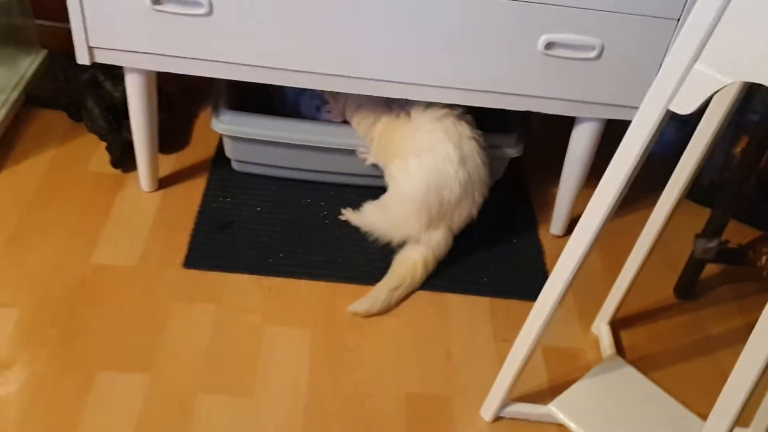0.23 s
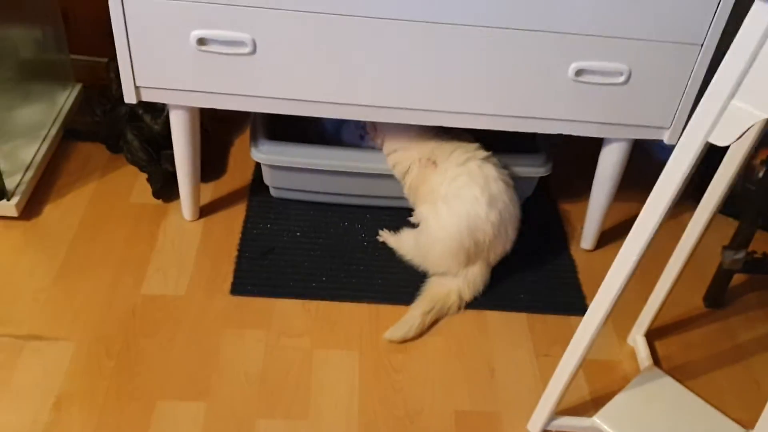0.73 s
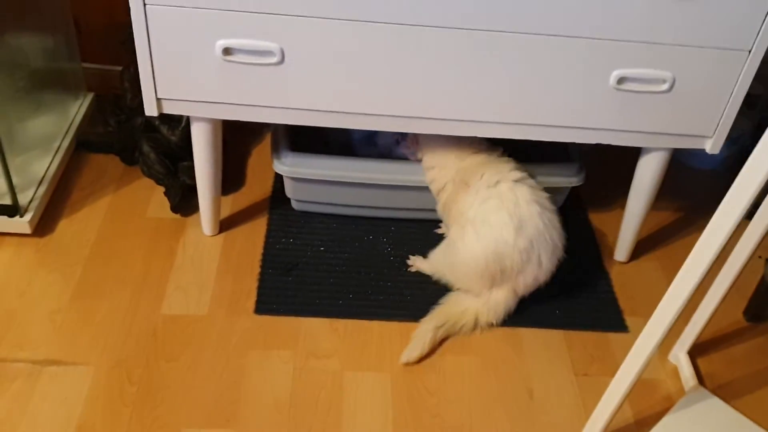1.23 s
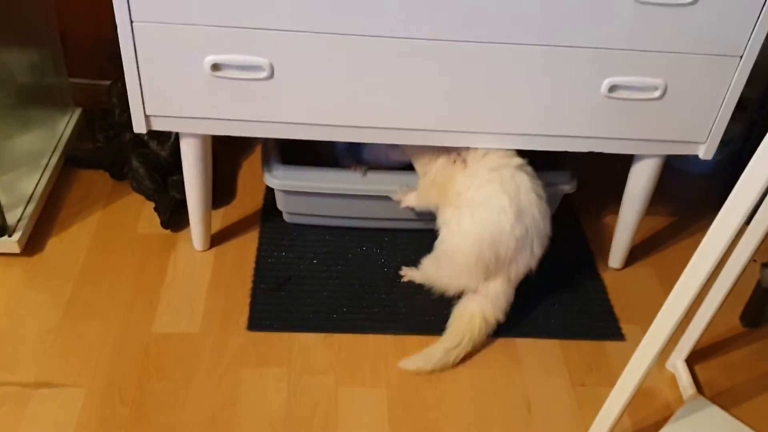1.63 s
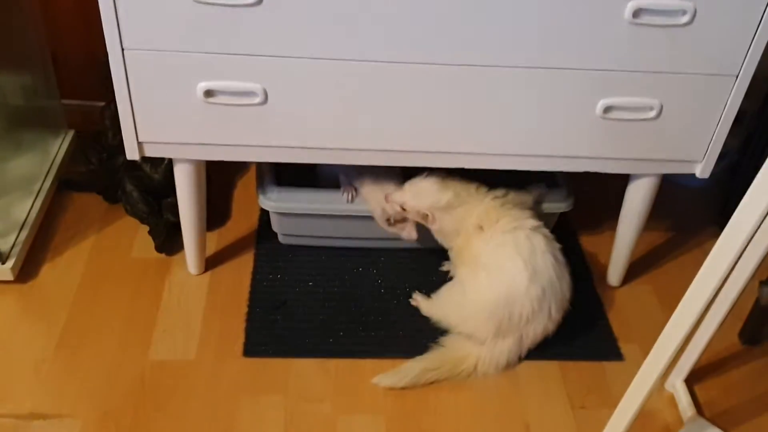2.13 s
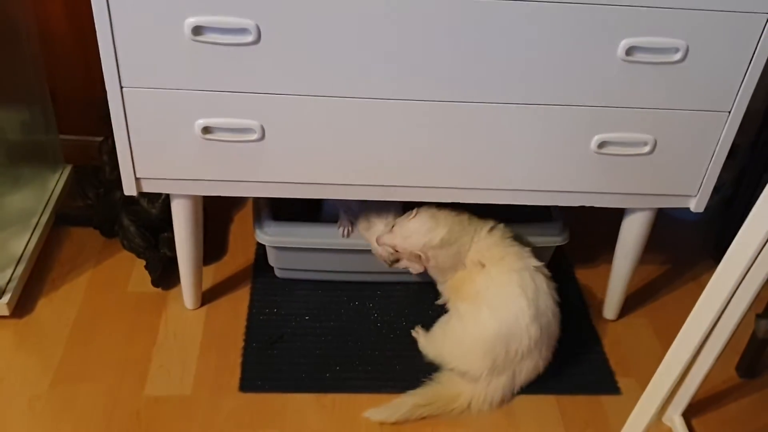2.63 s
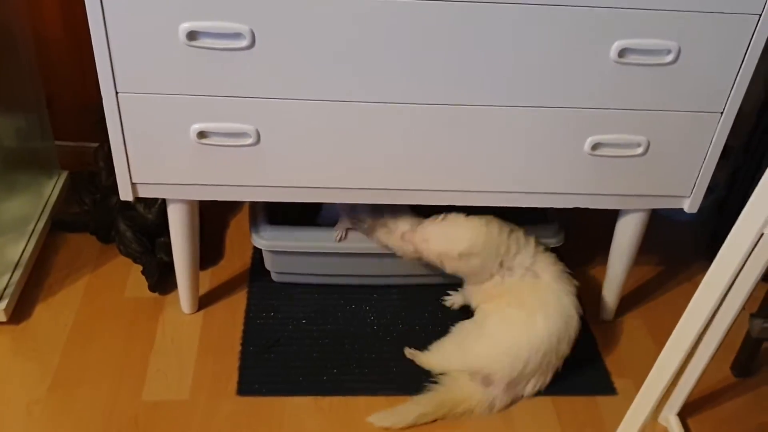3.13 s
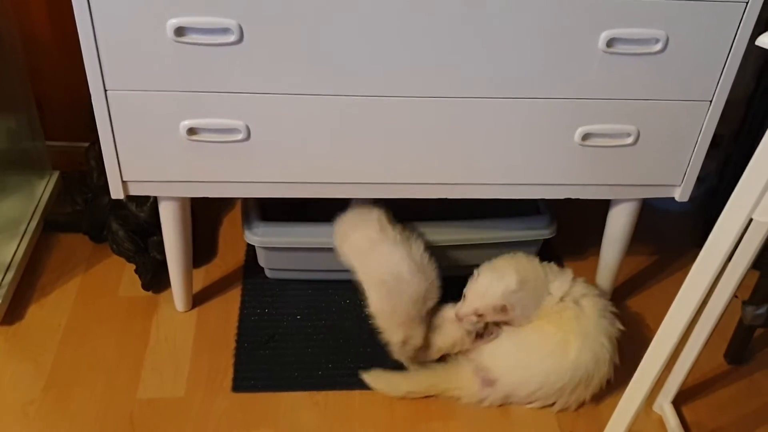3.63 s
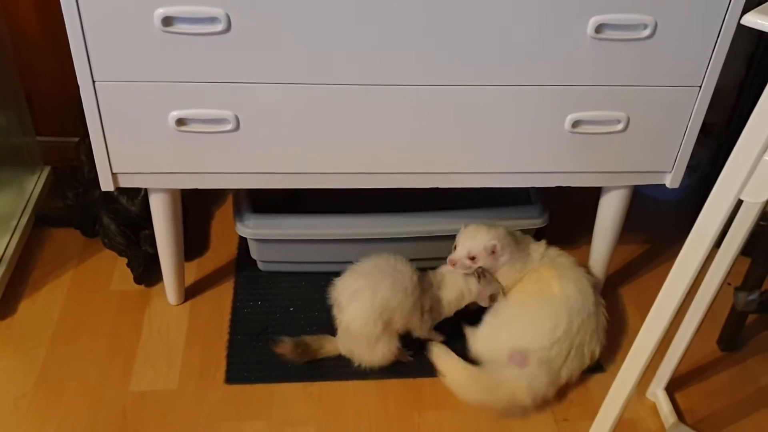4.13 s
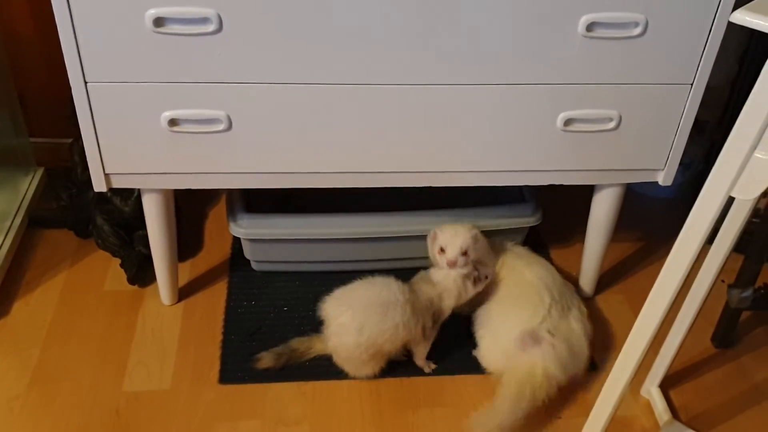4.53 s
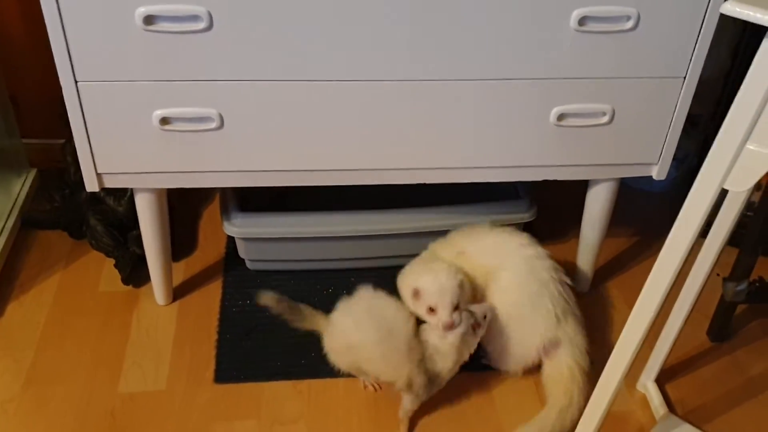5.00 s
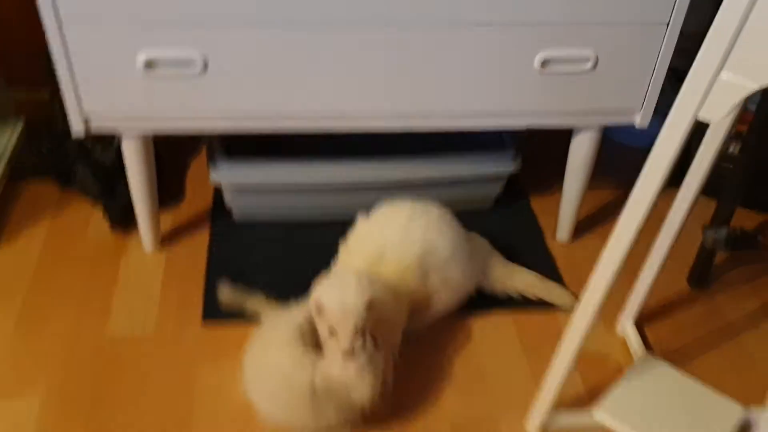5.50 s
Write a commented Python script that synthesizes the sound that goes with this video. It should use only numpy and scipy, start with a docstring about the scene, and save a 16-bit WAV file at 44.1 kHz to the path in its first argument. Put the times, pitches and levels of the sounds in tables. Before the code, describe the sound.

In a quiet small room, a nearby microphone picks up two ferrets playing. Their bodies knock against a plastic tub and thump softly on the floor, with scratching claws and rustling fur. Soft grunts and clucks come in short runs, then turn into louder, rapid chatter with a couple of sharp squeaks and small hisses. A last bump and cluck come at the end.

```python
"""Ferrets wrestling around a tub

Two ferrets wrestle in and beside a plastic tub in a small quiet room. Their clucks, about eleven a second
in a run, and squeaks are harmonic series with noise; grunts, hisses and sniffs are shaped noise.
Bumps are damped pulses that excite the modes of the tub, landings are deep thuds, claws click and scrape
as grainy bursts, and fur brushes as patchy noise. Echoes and a decaying tail form the room over a hush."""
import sys
import numpy as np
from scipy import signal
from scipy.fft import rfft, irfft, next_fast_len
from scipy.io import wavfile
from scipy.ndimage import uniform_filter1d

SR = 44100
rng = np.random.default_rng(int(sys.argv[2]) if len(sys.argv) > 2 else 0)


def to_wav(sig):
    """Store sig (one row per channel, or 1-D mono) as 16-bit WAV at the path in sys.argv[1].

    Samples outside -1..1 are clipped; the rate is SR.
    """
    pcm = np.clip(np.atleast_2d(sig), -1, 1) * 32767
    pcm = np.round(pcm).astype(np.int16)
    wavfile.write(sys.argv[1], SR, pcm.T)  # frames by channels


N = 254016  # samples

# Levels in the tables are relative: the layers are balanced again in scene().
# claw clicks: (t/s, level/dB, brightness 0-1)
CLAW_CLICKS = [(.116, -51, .48), (.566, -47, .4), (.57, -36.5, .14), (.625, -51, .94), (1.304, -59.5, 1),
               (1.408, -56, 0), (1.43, -60.5, .8), (1.516, -36.5, .6), (1.977, -43, .4), (2.001, -43, .3),
               (2.012, -44, .6), (2.103, -47.5, .54), (2.134, -37.5, .53), (2.251, -47, .75),
               (2.279, -42.5, .18), (2.281, -40.5, .85), (2.449, -53, .4), (2.481, -51, .2),
               (2.559, -48, .45), (2.785, -55, .35), (2.953, -56, .4), (3.384, -42.5, .31),
               (3.491, -50, .6), (3.609, -51.5, .4), (3.747, -49, .7), (5.228, -35, .73), (5.356, -51, .5)]
# spectra of a dull and a bright contact: (f/Hz, level/dB)
DULL_CONTACT = [(200, -6), (900, 5.5), (1900, -3.5), (2400, 1), (3200, 1), (4200, -7.5), (7500, -11),
                (11000, -15), (16000, -22.5)]
BRIGHT_CONTACT = [(200, -24), (1500, -19.5), (3000, -21), (4500, -8), (6000, -7.5), (7800, 0.5),
                  (9000, 1.5), (11000, 3), (13000, -4), (16000, -8.5)]
# spectrum of air through an open mouth: (f/Hz, level/dB)
OPEN_MOUTH = [(900, -20), (1500, -2), (2100, -26), (3000, 4.5), (4100, -19), (5300, -23), (7100, -2),
              (8600, -17.5), (11300, -18), (16000, -44)]


def amp(db):
    """Level to amplitude ratio: 20 dB is a factor of ten."""
    return 10 ** (np.asarray(db) / 20)


def evened(x):
    """Normalization to a root mean square of 1."""
    return x / np.sqrt(np.mean(x ** 2) + 1e-20)


def read(points, hz):
    """Linear interpolation of a table on a log-frequency axis."""
    f, value = np.transpose(points)
    return np.interp(np.log(hz + 1), np.log(f + 1), value)


def add(mix, s, sound):
    """Superposition of a sound on the mix from time s."""
    part = mix[max(round(s * SR), 0):][:len(sound)]
    part += sound[:len(part)]


def noise(size, colour, other=None, share=0):
    """Random-phase noise of rms 1, its spectrum a blend in dB of one or two colours."""
    hz = np.fft.rfftfreq(size, 1 / SR)
    other = colour if other is None else other
    db = (1 - share) * read(colour, hz) + share * read(other, hz)
    phase = np.exp(2j * np.pi * rng.random(len(hz)))
    return evened(irfft(amp(db) * phase, size))


def band(size, hz, width_hz):
    """Narrow-band noise of rms 1: complex low-passed noise shifted up to a centre frequency."""
    white = rng.standard_normal(size) + 1j * rng.standard_normal(size)
    fuzz = signal.sosfilt(signal.butter(2, width_hz / 2, fs=SR, output="sos"), white)
    carrier = np.exp(2j * np.pi * hz * np.arange(size) / SR)
    return evened((fuzz * carrier).real)


def wander(size, hz):
    """Random modulation: straight lines between normal deviates drawn hz times a second."""
    at = np.arange(size) * hz / SR
    knots = np.arange(int(at[-1]) + 2)
    return np.interp(at, knots, rng.standard_normal(len(knots)))


def gate(t, length, rise, fall):
    """Amplitude envelope with quarter-sine rise and fall, in seconds."""
    opening = np.sin(np.pi / 2 * np.clip(t / rise, 0, 1))
    closing = np.sin(np.pi / 2 * np.clip((length - t) / fall, 0, 1))
    return opening * closing


def pair(x):
    """Interchannel coherence: unrelated channels become alike in the bass, as at two close microphones."""
    # left-right correlation: (f/Hz, correlation 0-1)
    coherence = [(100, 0.46), (300, 0.93), (1000, 0.14), (2500, 0), (10000, 0)]
    a, b = rfft(x)
    same = read(coherence, np.fft.rfftfreq(x.shape[1], 1 / SR))
    return irfft(np.array([a, same * a + np.sqrt(1 - same ** 2) * b]), x.shape[1])


def voice(hz, harmonics_db, jitter):
    """Harmonic series of rms 1 on a randomly frequency-modulated fundamental."""
    turns = np.cumsum(hz * (1 + jitter * wander(len(hz), hz=510))) / SR
    partials = [amp(db) * np.sin(2 * np.pi * (k + 1) * turns) for k, db in enumerate(harmonics_db)]
    return evened(sum(partials))


def quiet(left_db=2, level_db=-69.1):
    """Stationary background noise: the steady, partly coherent hush of the room."""
    # spectrum of the hush: (f/Hz, level/dB)
    hush_colour = [(12, -30), (25, -5), (70, 0), (230, -4), (450, -6), (680, -6.5), (980, -9),
                   (1400, -15.5), (2400, -18), (4300, -25), (5300, -28), (7300, -21), (8500, -23.5),
                   (10800, -22), (14700, -25), (16000, -38)]
    hush = pair(np.array([noise(N, hush_colour), noise(N, hush_colour)]))
    side = np.array([[.5], [-.5]])
    return amp(level_db + side * left_db) * hush


def room(x, near_db=-3, near_fade=0.018, tail_left_db=6.5, lag_s=.00002):
    """Reverberation: direct sound, quick echoes off floor and furniture, and an exponential tail."""
    # reverberation time: (f/Hz, t60/s)
    decay_times = [(100, 0.29), (500, 0.4), (1500, 0.33), (4000, 0.25), (8000, 0.2), (15000, 0.3)]
    # reflected against direct sound: (f/Hz, level/dB)
    reflected = [(100, -12.5), (500, -10.5), (1200, -10.5), (3000, -2), (8000, -2.5), (15000, -2.5)]
    # left minus right in the direct sound: (f/Hz, level/dB)
    left_excess = [(100, 4.5), (300, 4), (600, 7), (1200, 7), (2200, 10), (4200, 5.5), (8000, 7),
                   (14000, -6)]
    size = SR * 3 // 4
    t = np.arange(size) / SR
    # sparse random impulses, about 4000 a second
    impulses = rng.choice([-1., 1.], (2, size)) * (rng.random((2, size)) < 4000 / SR)
    taps = pair(impulses)
    hz, at, z = signal.stft(taps, SR, nperseg=256)
    decay = amp(-60 * at / read(decay_times, hz)[:, None])
    tail = signal.istft(z * decay, SR, nperseg=256)[1][:, :size] * (t > .008)
    near = taps * np.exp(-t / near_fade) * (t > .0005)
    echoes = tail / np.linalg.norm(tail[0]) + amp(near_db) * near / np.linalg.norm(near[0])
    full = next_fast_len(N + size)
    hz, side = np.fft.rfftfreq(full, 1 / SR), np.array([[.5], [-.5]])
    lag = np.exp(-2j * np.pi * hz * side * lag_s)  # the left channel lags the right
    direct = amp(side * read(left_excess, hz)) * lag
    paths = direct + amp(read(reflected, hz) + side * tail_left_db) * rfft(echoes, full)
    return irfft(rfft(x, full) * paths, full)[:, :N]


def landings(hz=70, damping=0.015):
    """Damped oscillation: the floor gives under a body's weight with a soft, deep thud."""
    # bodies landing on the floorboards: (t/s, level/dB)
    landing_rows = [(.056, -52.5), (.534, -49.5), (2.002, -54), (2.288, -55), (2.64, -48), (3.675, -49.5),
                    (4.175, -57), (5.73, -62)]
    out, t = np.zeros(N), np.arange(SR // 4) / SR
    swell = t / damping * np.exp(1 - t / damping)
    for s, db in landing_rows:
        add(out, s, amp(db) * swell * np.sin(2 * np.pi * hz * t))
    return out


def bumps(rattle_rise=0.0016, rattle_fade=0.0098, ring_db=-4, damping_cycles=.75):
    """Modal excitation: damped heaves and rattles on tub or mat drive the resonances of the tub."""
    # bumps on the tub or the mat: (t/s, heave level/dB, heave f/Hz, rattle level/dB)
    bump_rows = [(.052, -43, 177, -46), (.12, -47, 275, -55), (.148, -46.5, 196, -56),
                 (.462, -35.5, 195, -41.5), (.479, -40, 227, -32), (.518, -48, 250, -37.5),
                 (.533, -28.5, 184, -34), (.569, -31, 200, -26.5), (1.5, -46, 240, -60),
                 (1.517, -49, 204, -51.5), (1.774, -47, 221, -50), (1.87, -43, 230, -51),
                 (1.979, -31.5, 221, -42), (1.999, -29.5, 197, -32), (2.135, -44.5, 170, -42.5),
                 (2.326, -47, 177, -45), (2.479, -45, 224, -43), (2.545, -42, 227, -49.5),
                 (2.612, -36, 177, -44.5), (2.638, -29.5, 195, -36), (3.079, -35.5, 194, -40.5),
                 (3.384, -44.5, 232, -42), (3.414, -43, 273, -42.5), (3.49, -39.5, 198, -38),
                 (3.619, -48, 159, -42), (3.67, -35, 172, -39), (3.682, -34, 176, -37.5),
                 (4.169, -50, 121, -57), (5.677, -44, 242, -47.5), (5.734, -49, 142, -55)]
    # resonances of the tub: (f/Hz, level/dB, t60/s)
    tub_modes = [(100, -8.5, 0.18), (167.3, 2.5, 0.25), (226, 3, 0.31), (268, 4.5, 0.28), (399, 3, 0.28),
                 (500, -16, 0.083), (568, 7, 0.25), (606, 0, 0.053), (733, 2.5, 0.13), (883, 1, 0.069)]
    # spectrum of the rattle: (f/Hz, level/dB)
    rattle_colour = [(40, -50), (70, 9), (130, -4), (300, 7.5), (550, -4.5), (800, -7), (1300, -15),
                     (2000, -21), (3500, -40.5), (9000, -45)]
    # light paw falls in the tub between the bumps
    from_s, to_s, paws_per_s = 1.45, 3.4, 13
    paw_db, paw_hz, paw_spread_hz, paw_rattle_db = -54, 260, 40, -64
    steps = np.arange(from_s, to_s, 1 / paws_per_s)
    paws = [(s + late / paws_per_s / 2, paw_db, paw_hz + paw_spread_hz * spot, paw_rattle_db)
            for s, (late, spot) in zip(steps, rng.uniform(-1, 1, (len(steps), 2)))]

    out, t = np.zeros(N), np.arange(SR // 5) / SR
    rattle_envelope = (1 - np.exp(-t / rattle_rise)) * np.exp(-t / rattle_fade)
    for s, db, hz, rattle_db in list(bump_rows) + paws:
        swell = t * hz / (2 * damping_cycles)  # a lower bump presses longer
        heave = (swell * np.exp(1 - swell)) ** 2 * np.sin(2 * np.pi * hz * t)
        rattle = rattle_envelope * noise(len(t), rattle_colour)
        add(out, s, amp(db) * heave + amp(rattle_db) * rattle)

    t, ring = np.arange(SR // 2) / SR, 0
    for hz, db, t60 in tub_modes:
        unit_gain = 2 * np.log(1000) / (t60 * SR)  # about 1 at resonance
        ring = ring + unit_gain * amp(db - 60 * t / t60) * np.cos(2 * np.pi * hz * t)
    return out + amp(ring_db) * signal.oaconvolve(out, ring)[:N]


def brushes(grain_db=2.0, rise=0.0017, fall=0.018, patch_db=4.5):
    """Stick-slip friction: rubbing hiss that catches and slips, uneven in time and frequency."""
    # strokes of fur or claws over the mat and tub: (t/s, length/s, level/dB, brightness 0-1)
    stroke_rows = [(0, .095, -62.5, .5), (.48, .03, -61, .15), (.52, .04, -52, .33), (.599, .13, -62, .24),
                   (1.848, .055, -48, .53), (1.903, .185, -56.5, .4), (1.98, .045, -46, .4),
                   (2.534, .135, -56.5, .6), (2.66, .32, -65, .22), (3.072, .07, -59, .36),
                   (3.13, .06, -57, .25), (3.395, .21, -55.5, .28), (3.66, .15, -62, .8),
                   (4.022, .32, -72, .5), (5, .065, -52.5, 1), (5.051, .089, -59, .61),
                   (5.215, .04, -58, .73), (5.502, .25, -59.5, .58)]
    out = np.zeros(N)
    for s, length, db, bright in stroke_rows:
        t = np.arange(0, length, 1 / SR)
        slips = evened(amp(grain_db * wander(len(t), hz=350.5)))
        hiss = noise(len(t), DULL_CONTACT, BRIGHT_CONTACT, bright)
        add(out, s, amp(db) * gate(t, length, rise, fall) * slips * hiss)
    # small random patches of gain give each tiny catch its own colour
    z = signal.stft(out, nperseg=256)[2]
    across_hz = uniform_filter1d(rng.standard_normal(z.shape), size=7, axis=0)
    patches = evened(uniform_filter1d(across_hz, size=3, axis=1))
    return signal.istft(z * evened(amp(patch_db * patches)), nperseg=256)[1][:N]


def claws(grain_db=4, spot_db=-5, spot_width_hz=1300, hard_db=-38, doubling_db=16):
    """Impact and friction: a claw lands and skids in a grainy burst coloured by the spot it strikes."""
    skid_fade_s, spot_hz, spot_octaves = .004, 2100, 2.7
    out, t = np.zeros(N), np.arange(SR // 8) / SR
    attack = 1 - np.exp(-t / .0005)
    for s, db, bright in CLAW_CLICKS:
        hz = spot_hz * 2 ** (spot_octaves * bright)  # a harder spot rings higher
        fade = skid_fade_s * 2 ** ((hard_db - db) / doubling_db)  # a softer claw skids for longer
        slips = evened(amp(grain_db * wander(len(t), hz=1125)))
        scrape = noise(len(t), DULL_CONTACT, BRIGHT_CONTACT, bright)
        skid = evened(scrape + amp(spot_db) * band(len(t), hz, spot_width_hz))
        add(out, s, amp(db) * attack * np.exp(-t / fade) * slips * skid)
    return out


def ticks(hz=12500, fade=.00012, tip_db=9):
    """Short contact: a claw tip meeting a hard surface gives a few very fast cycles, strong if bright."""
    out, t = np.zeros(N), np.arange(SR // 200) / SR
    tick = np.exp(-t / fade) * np.cos(2 * np.pi * hz * t)
    for s, db, bright in CLAW_CLICKS:
        add(out, s, bright * amp(db + tip_db) * tick)
    return out


def whistles(width_at_2khz_hz=210, rise=.04, fall=.06):
    """Narrow-band turbulence: air in a ferret's nostrils makes fuzzy bands, wider when higher."""
    # thin whistles of a sniff between two runs of clucks: (t/s, length/s, f/Hz, level/dB)
    whistle_rows = [(.95, .3, 7480, -76), (1.065, .08, 14000, -67), (1.05, .2, 10700, -75)]
    out = np.zeros(N)
    for s, length, hz, db in whistle_rows:
        t = np.arange(0, length, 1 / SR)
        fuzz = band(len(t), hz, width_at_2khz_hz * np.sqrt(hz / 2000))
        add(out, s, amp(db) * gate(t, length, rise, fall) * fuzz)
    return out


def hisses(flutter_db=-2.5, flutter_hz=400, rise=0.015, fall=0.022):
    """Turbulence through a resonant mouth: fluttering air, its strong bands lower as the mouth opens."""
    # hisses or snuffles: (t/s, length/s, level/dB, mouth opening 0-1)
    hiss_rows = [(1.341, .022, -53.5, .94), (1.672, .053, -66.5, .7), (4.224, .06, -61.5, .83),
                 (4.27, .15, -63.5, 0), (4.369, .11, -56.5, .25), (5.401, .045, -48.5, .72),
                 (5.444, .057, -50, 0)]
    # spectrum of air through a nearly shut mouth: (f/Hz, level/dB)
    shut_mouth = [(900, -7), (1500, 5), (2000, -10), (2600, -19.5), (3900, -18), (5300, 1), (6800, -6.5),
                  (8300, -3.5), (11000, 7), (12200, -7.5), (16000, -17)]
    out = np.zeros(N)
    for s, length, db, mouth in hiss_rows:
        t = np.arange(0, length, 1 / SR)
        flutter = evened(amp(flutter_db * wander(len(t), flutter_hz)))
        air = noise(len(t), shut_mouth, OPEN_MOUTH, mouth)
        add(out, s, amp(db) * gate(t, length, rise, fall) * flutter * air)
    return out


def grunts(length=.03, rise=0.003, fall=0.011):
    """Aperiodic excitation: hoarse little pushes of air without a clear note."""
    # voiceless clucks: (t/s, level/dB)
    grunt_rows = [(0, -58), (.268, -57), (.363, -55), (.745, -53), (1.3, -61.5), (1.403, -58),
                  (1.483, -51.5), (1.585, -54), (1.678, -53.5), (1.765, -52), (2.184, -51), (2.382, -53.5),
                  (2.767, -54), (2.853, -52), (2.942, -51), (3.127, -49.5), (3.219, -52.5), (3.315, -57),
                  (3.47, -50), (3.888, -50), (5.356, -57)]
    # spectrum of a grunt: (f/Hz, level/dB)
    grunt_colour = [(80, -19), (220, 4), (330, 0.5), (430, -0.5), (560, -12.5), (720, -2.5), (900, -11.5),
                    (1120, -15), (1450, -21), (2200, -32), (5000, -36)]
    out, t = np.zeros(N), np.arange(0, length, 1 / SR)
    for s, db in grunt_rows:
        add(out, s, amp(db) * gate(t, length, rise, fall) * noise(len(t), grunt_colour))
    return out


def cries(jitter=0.022, air_db=-20, rise=.004, fall=.007, hold=.27):
    """Source and filter: notes hold, then swoop; a shut mouth holds back the fundamental, and air rasps."""
    # squeaks or squeals: (t/s, length/s, start f/Hz, end f/Hz, level/dB, mouth opening 0-1)
    cry_rows = [(1.254, .018, 748, 770, -54, 0), (1.334, .018, 790, 850, -48, 0),
                (1.351, .012, 950, 1000, -47, 1), (3.66, .057, 860, 1690, -39, 1),
                (3.731, .035, 1470, 1665, -35.3, 1), (3.971, .03, 805, 880, -52, .8),
                (5.429, .027, 1000, 1250, -48, 1)]
    # one row a harmonic: (level through a shut mouth/dB, level through an open mouth/dB)
    cry_harmonics = [(-5.5, -1.5), (1, -18), (-19, -27), (-12, -37), (-45, -46)]
    out = np.zeros(N)
    for s, length, start_hz, end_hz, db, mouth in cry_rows:
        t = np.arange(0, length, 1 / SR)
        # the pitch holds for the first share of the cry
        swoop = np.sin(np.pi / 2 * np.clip((t / length - hold) / (1 - hold), 0, 1)) ** 2
        pitch_hz = start_hz * (end_hz / start_hz) ** swoop
        note = voice(pitch_hz, np.dot(cry_harmonics, [1 - mouth, mouth]), jitter)
        air = amp(air_db) * noise(len(t), OPEN_MOUTH)
        add(out, s, amp(db) * gate(t, length, rise, fall) * (note + air))
    return out


def clucks(sag=0.06, arch=0.1, rise=0.0069, fall=0.0094, third_db=-25, fourth_db=-39):
    """Periodic source with breath noise: short notes arch and sag in pitch while air rasps through."""
    # voiced clucks: (t/s, length/s, f/Hz, level/dB)
    cluck_rows = [(.73, .036, 494, -54), (.825, .032, 529, -50.5), (.919, .031, 512, -55),
                  (1.844, .037, 535, -52), (1.939, .035, 512, -49.5), (2.464, .032, 524, -47.5),
                  (3.041, .04, 542, -52), (3.403, .025, 538, -46), (3.501, .031, 573, -42),
                  (3.602, .028, 624, -36.5), (3.692, .031, 628, -36.5), (3.8, .021, 561, -43.5),
                  (3.882, .028, 576, -42), (3.981, .026, 580, -41), (4.075, .027, 569, -42),
                  (4.154, .032, 574, -41), (4.238, .034, 595, -39.5), (4.492, .03, 510, -51.5),
                  (4.599, .032, 521, -50), (4.698, .021, 541, -48), (4.775, .031, 569, -40),
                  (4.872, .022, 543, -44.5), (4.965, .028, 562, -43), (5.207, .02, 545, -49.5),
                  (5.402, .024, 550, -44.5), (5.492, .024, 562, -40), (5.589, .023, 526, -46),
                  (5.665, .032, 553, -42), (5.751, .036, 616, -35)]
    # spectrum of the rasping air: (f/Hz, level/dB)
    rasp_colour = [(100, -57), (250, -8), (550, -8.5), (800, 1), (1150, -6), (1450, -8.5), (1900, -22),
                   (2500, -49), (6000, -39)]
    # muffling, lost by and large as the ferret leaves the tub: (t/s, fundamental re second harmonic/dB)
    muffling = [(.8, 9), (1.8, 3), (2, -3), (3.1, 2), (3.6, -1), (3.9, -6), (4.8, -3.5), (5.7, -8)]
    # a harder push makes a cluck cleaner, and no two are quite alike
    full_db, full_rough, rough_per_db, rough_spread = -36, .23, .008, .07
    out = np.zeros(N)
    for s, length, hz, db in cluck_rows:
        t = np.arange(0, length, 1 / SR)
        chance = rough_spread * rng.standard_normal()
        rough = np.clip(full_rough + rough_per_db * (full_db - db) + chance, 0, 1)
        along = t / length - .5
        pitch_hz = hz * (1 - sag * along - arch * along ** 2)
        first_db = np.interp(s, *np.transpose(muffling))
        tone = voice(pitch_hz, [first_db, 0, third_db, fourth_db], jitter=0.0087 + 0.057 * rough)
        cluck = evened((1 - rough) * tone + rough * noise(len(t), rasp_colour))
        add(out, s, amp(db) * gate(t, length, rise, fall) * cluck)
    return out


def scene():
    """Superposition: voices and scuffling share one room over its hush."""
    scuffle = bumps() + landings() + amp(2) * claws() + ticks() + amp(-3.5) * brushes()
    voices = clucks() + grunts() + cries() + amp(-5) * hisses() + amp(-2.5) * whistles()
    return amp(-3.3) * room(voices + scuffle) + quiet()


def record(dry, bass_hz=38, edge_hz=15950):
    """Band limiting: the microphone sheds the deepest bass, then a linear-phase low-pass cuts the top."""
    heard = signal.sosfilt(signal.butter(2, bass_hz, "highpass", fs=SR, output="sos"), dry)
    low_pass = signal.firwin(511, edge_hz, window=("kaiser", 9), fs=SR)
    return signal.oaconvolve(heard, low_pass[None], "same")


dry = scene()
out = record(dry)
to_wav(out)
```